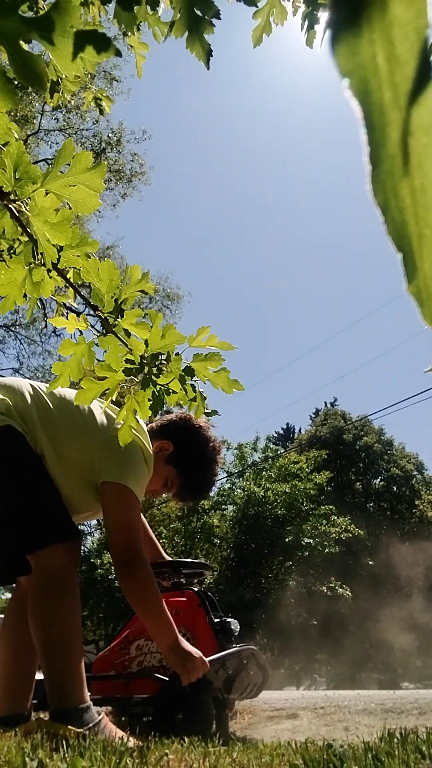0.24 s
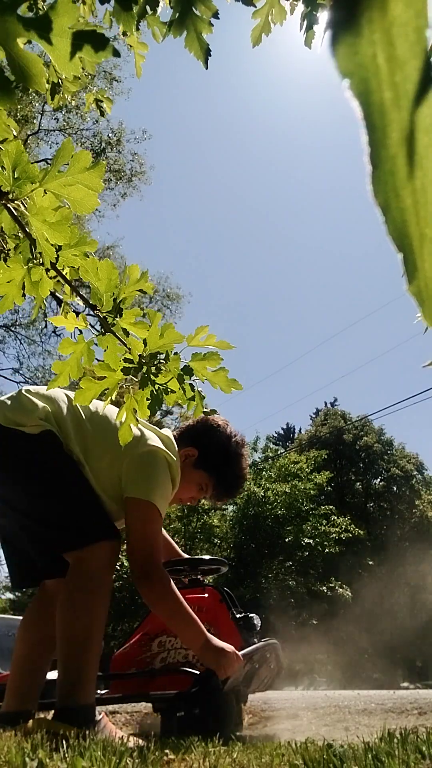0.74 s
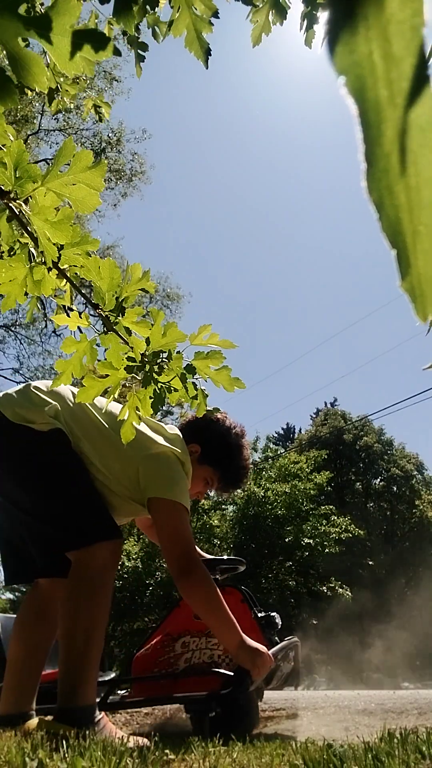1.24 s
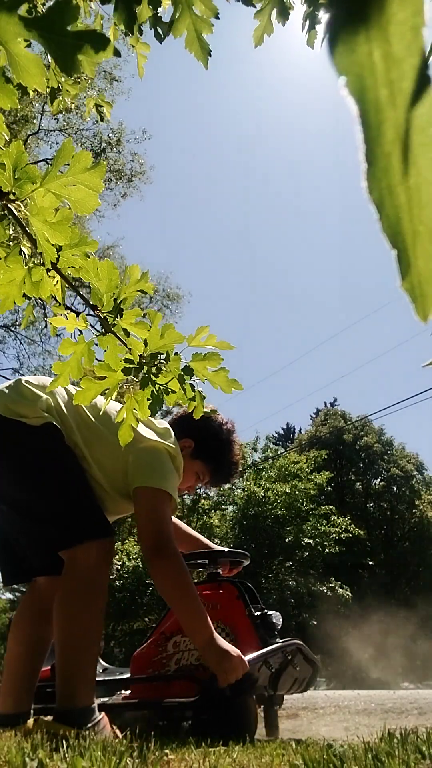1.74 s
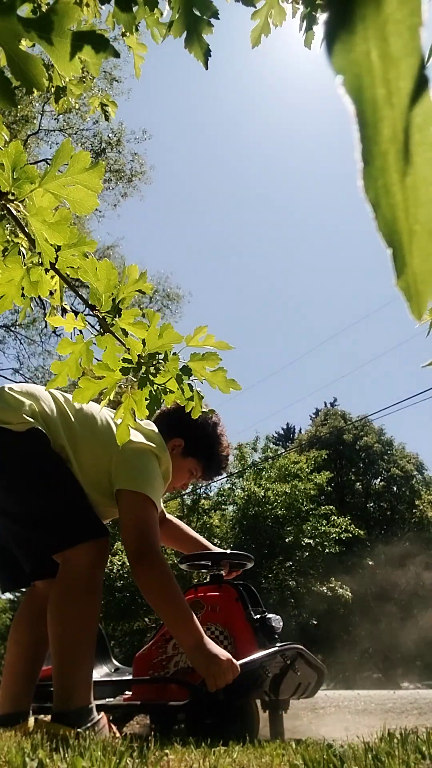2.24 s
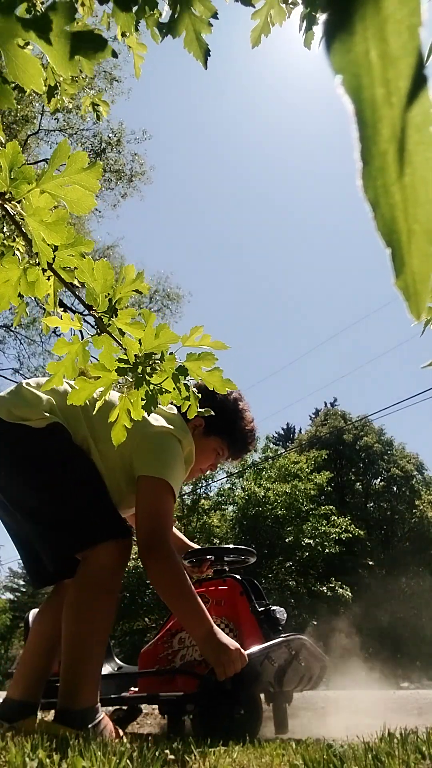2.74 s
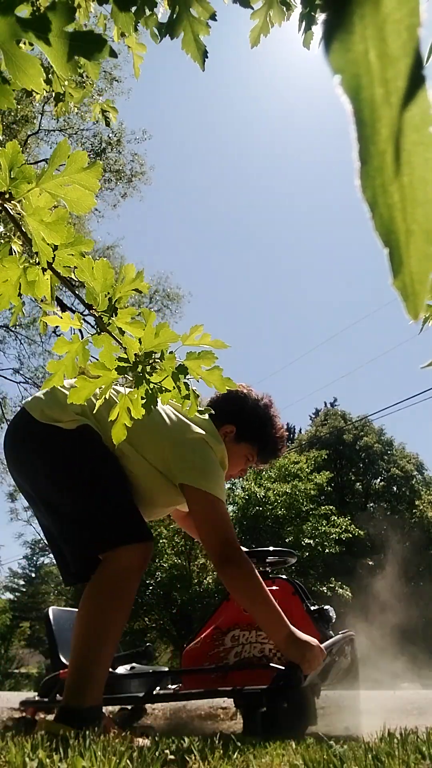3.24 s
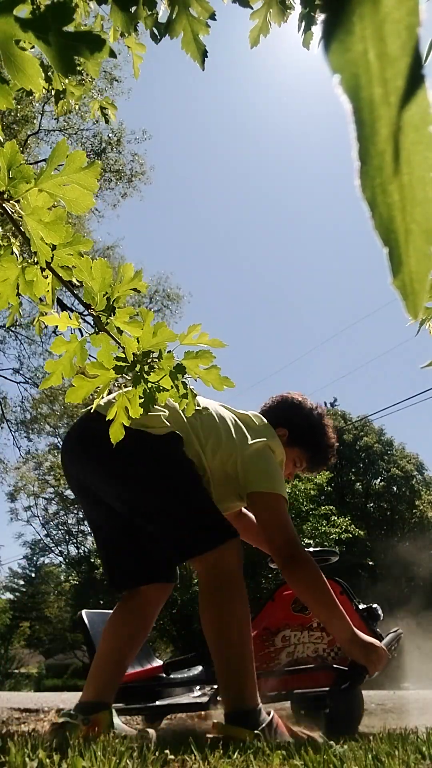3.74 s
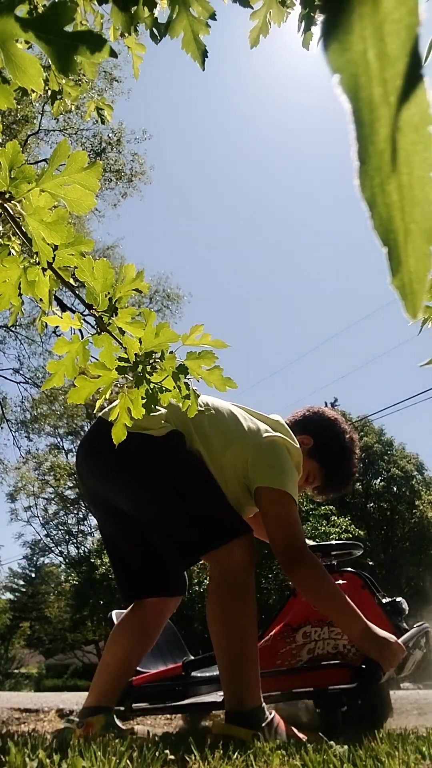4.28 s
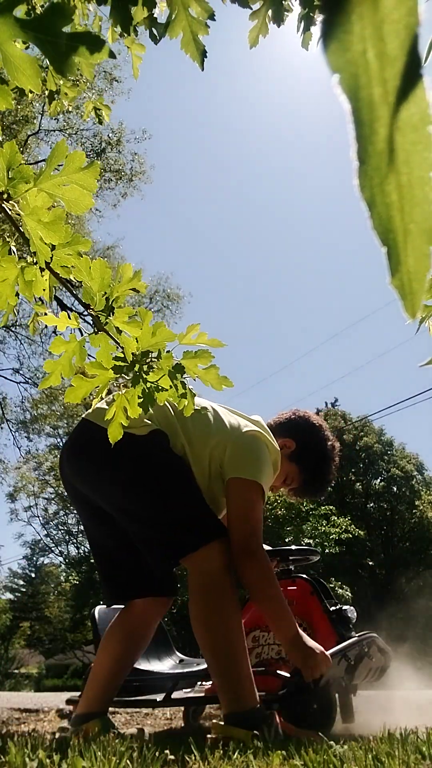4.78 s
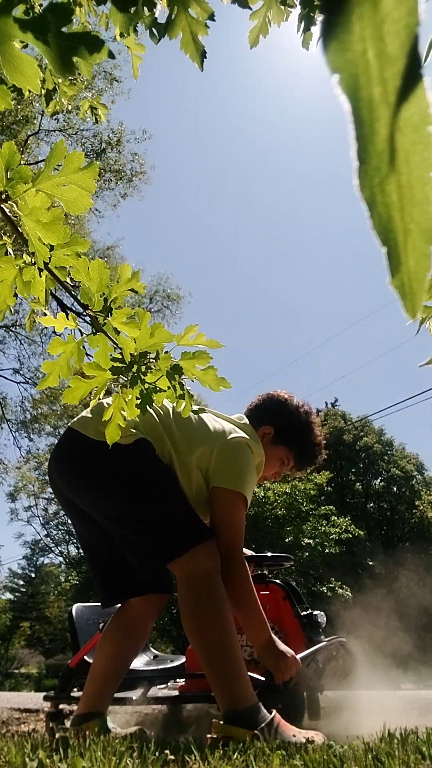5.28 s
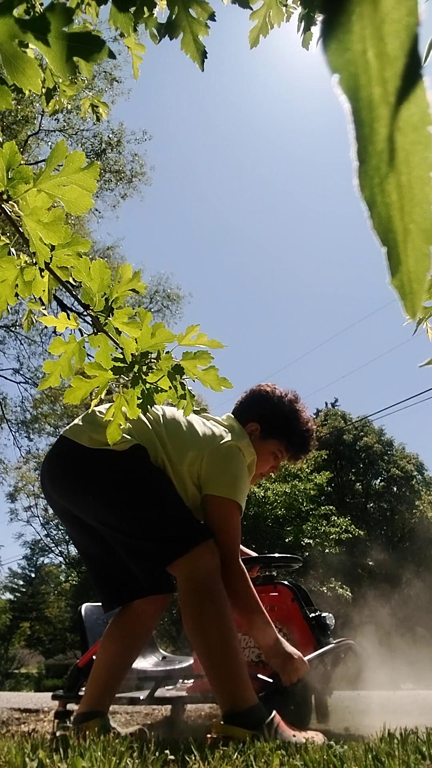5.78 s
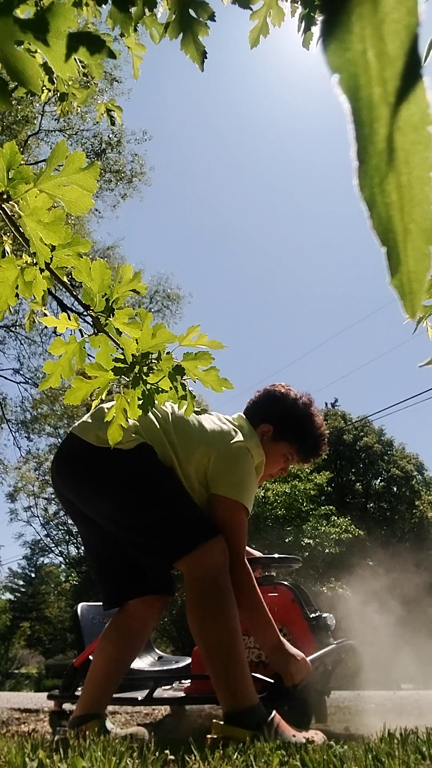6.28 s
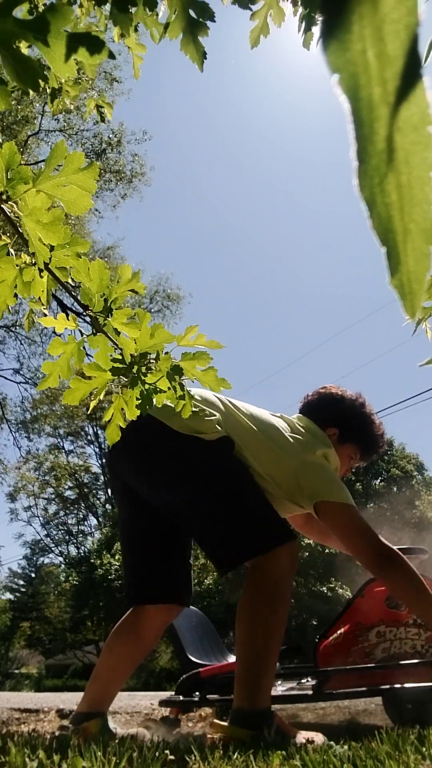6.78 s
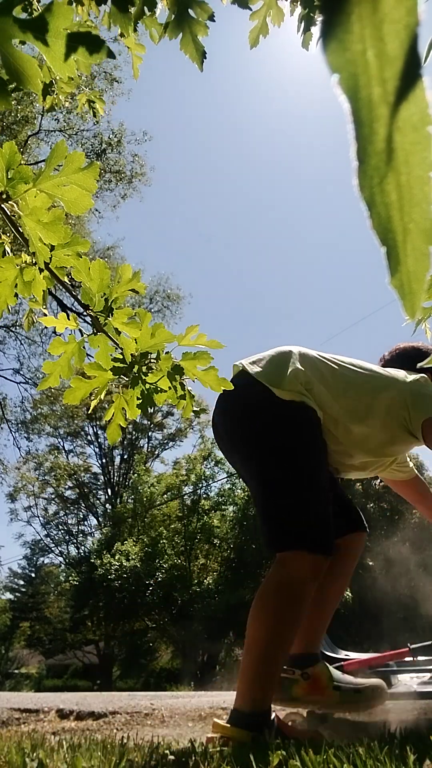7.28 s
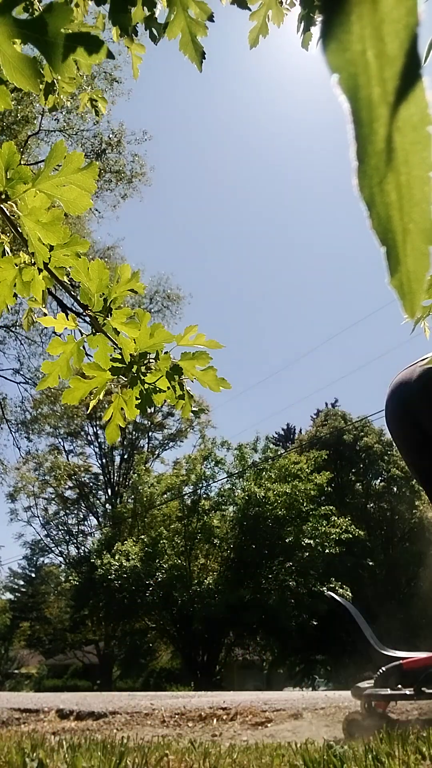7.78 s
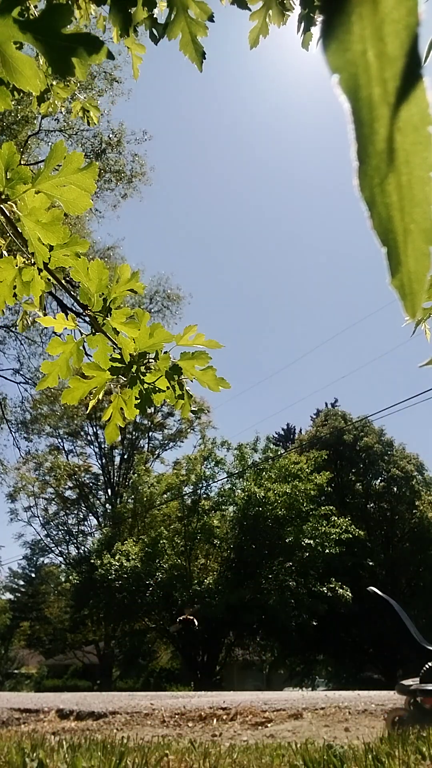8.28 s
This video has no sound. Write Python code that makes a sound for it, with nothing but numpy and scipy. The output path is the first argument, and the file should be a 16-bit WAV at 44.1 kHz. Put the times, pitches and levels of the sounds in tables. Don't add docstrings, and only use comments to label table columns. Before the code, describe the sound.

An electric kart held back at the roadside whines, then its drive wheel hops and drums on gravel, labours, stops and coasts off with ticking casters.

```python
import sys
import numpy as np
from scipy import signal
from scipy.fft import rfft, irfft, next_fast_len
from scipy.io import wavfile
from scipy.ndimage import map_coordinates

SR = 44100
rng = np.random.default_rng(int(sys.argv[2]) if len(sys.argv) > 2 else 0)


def dump(signal):
    limited = np.clip(np.atleast_2d(signal).T, -1, 1)
    pcm = np.round(limited * 32767).astype(np.int16)
    wavfile.write(sys.argv[1], SR, pcm)


def voltage_ratio(level):
    return 10 ** (np.asarray(level, float) / 20)


N = 375725
TOP_HZ = 15870


def unit(x):
    return x / np.sqrt(np.mean(x ** 2) + 1e-20)


def along(points, hz):
    f, v = np.transpose(points)
    return np.interp(np.log(hz + 1), np.log(f + 1), v)


def curves(rows):
    s, *cols = np.transpose(rows)
    return [np.interp(np.arange(N) / SR, s, c) for c in cols]


def wobble(rate):
    return map_coordinates(rng.standard_normal(int(N * rate / SR) + 4), [np.arange(N) * rate / SR])


def filtered(x, response):
    m = next_fast_len(N + SR // 2)
    return irfft(rfft(x, m) * response(np.fft.rfftfreq(m, 1 / SR)), m)[..., :N]


def modes(table):
    def response(f):
        return sum((-1) ** k * voltage_ratio(db) * 1j * f * width / (hz * hz - f * f + 1j * f * width)
                   for k, (hz, width, db) in enumerate(table))
    return response


def colour(spectrum):
    return lambda hz: voltage_ratio(along(spectrum, hz))


def grains(lumpy_db, rate):
    return unit(voltage_ratio(lumpy_db * wobble(rate)) * rng.standard_normal(N))


def bursts(times, envelopes):
    out = np.zeros(N + SR)
    for s, e in zip(times, envelopes * rng.standard_normal(envelopes.shape)):
        out[round(s * SR):][:len(e)] += e
    return out[:N]


# (time [s], peak level [dB], frame note [Hz])
HOPS = [(0.352, -21, 275.9), (0.74, -16, 311), (0.771, -10.5, 249), (0.833, -11.5, 220), (1.023, -12, 215),
        (1.082, -7.5, 232), (1.267, -11, 230), (1.34, -5.5, 238), (1.397, -12, 241), (1.566, -14.5, 219),
        (1.938, -16.5, 204), (1.999, -9.5, 206), (2.169, -4, 225), (2.638, -13.5, 255.7), (3.016, -9, 196),
        (3.081, -12, 217), (3.168, -4.5, 275), (3.24, -15, 228), (3.288, -4.5, 234.4), (3.392, -4, 246),
        (3.602, -9.5, 268), (3.659, -24, 220), (3.739, -7.5, 247), (3.845, -10, 260), (4.063, -10.5, 284),
        (4.108, -15, 280), (4.162, -7, 273), (4.342, -1.5, 238), (4.424, -4, 266), (4.462, -8, 225.8),
        (4.495, -12, 268), (4.71, -15, 279), (4.818, -8, 260.4), (4.915, -14, 255), (4.957, -15, 264),
        (5.036, -3, 242), (5.116, -15, 301), (5.278, -11, 278), (5.354, -24, 271.7), (5.426, -6, 238.6),
        (5.527, -30, 263), (5.574, -6, 262), (5.672, -5, 256.3), (5.705, -11.5, 230), (5.822, -13, 253),
        (5.972, -16, 270), (6.089, -16, 293), (6.484, -9, 219), (6.553, -19, 225), (6.734, -7.5, 232),
        (6.819, -10, 245), (6.857, -6, 285), (6.915, -5.5, 250), (6.982, -16.5, 236), (7.302, -13, 242),
        (7.755, -22, 302), (8.199, -20.5, 245), (8.367, -11.5, 274)]
# (time [s], peak level [dB], frame note [Hz])
MORE_HOPS = [(.005, -16, 244), (.065, -19, 242), (.93, -13, 238), (1.125, -6, 239), (4.325, -7.5, 299.5),
             (4.586, -7.5, 250), (7.034, -13.5, 262), (7.327, -17.5, 246), (7.35, -23.5, 254),
             (7.428, -22, 300), (7.45, -22.5, 257), (7.512, -25, 262), (7.618, -25.5, 245), (7.64, -32, 246),
             (7.839, -26, 270), (7.675, -25, 274), (8.329, -15.5, 256), (8.431, -8.5, 257),
             (8.445, -11.5, 263.5)]


def landings():
    out, t = np.zeros(N + SR), np.arange(SR // 8) / SR
    for s, db, hz in [*HOPS, *MORE_HOPS]:
        ring = voltage_ratio(db + 6.5 - 60 * t / 0.068) * (1 - np.exp(-t / 0.0053))
        out[round(s * SR):][:len(t)] += ring * np.sin(2 * np.pi * hz * t)
    return out[:N]


def damped():
    full_db, lead_s, t60 = -19, .006, .1
    grab, t = np.zeros(N + SR), np.arange(SR // 8) / SR
    for s, db, _ in [*HOPS, *MORE_HOPS]:
        grip = voltage_ratio(db - full_db - 60 * t / t60) * (1 - np.exp(-3 * t / lead_s))
        grab[max(round((s - lead_s) * SR), 0):][:len(t)] += grip
    return 1 / np.sqrt(1 + grab[:N] ** 2)


# (time [s], peak level [dB])
KNOCKS = [(0.052, -24), (0.42, -17), (0.834, -14), (0.88, -19), (1.098, -19), (1.139, -44), (1.187, -13),
          (1.254, -20), (1.393, -26), (1.541, -14), (1.721, -10), (1.805, -19), (1.931, -21), (1.993, -12),
          (2.167, -14.5), (2.641, -12.5), (3.046, -13), (3.284, -10), (3.367, -23), (3.586, -11.5),
          (3.68, -35), (3.708, -22), (3.837, -20), (4.026, -17), (4.212, -22), (4.288, -15), (4.452, -16.5),
          (4.554, -19), (5.034, -14.5), (5.197, -19), (5.266, -16), (5.398, -15), (5.479, -15.5),
          (5.659, -16.5), (5.684, -15), (5.825, -13.5), (5.862, -18.5), (6.047, -20), (6.264, -22),
          (6.544, -22.5), (6.585, -28), (6.608, -5), (6.641, -15), (6.872, -20), (6.91, -14.5),
          (6.981, -22.5), (7.303, -33), (7.753, -31.5), (8.369, -14.5), (8.431, -7.5)]
# (time [s], rattle level [dB], shell jar level [dB])
COAST = [(7.066, -46, -46), (7.0898, -51, -39), (7.1064, -40.5, -31), (7.2002, -41, -36.5),
         (7.248, -45.5, -48), (7.3146, -60, -57), (7.3293, -47, -39), (7.422, -53, -44),
         (7.498, -47.5, -50), (7.5066, -40, -57), (7.5478, -54, -57), (7.5906, -53, -52), (7.66, -52, -54),
         (7.736, -63, -63), (7.7485, -49.5, -46.5), (7.8316, -56, -44.5), (7.9015, -64, -48.5),
         (8.1495, -53, -47)]
COAST_JAR_DB = 7
# (frequency [Hz], width [Hz], level [dB])
FRAME = [(202.7, 69, -2.5), (245, 56.9, 1.5), (316.7, 46.8, -2.5), (420, 118, -7.5), (496, 173, -13)]
# (frequency [Hz], width [Hz], level [dB])
SHELL = [(644, 79, 3.5), (821, 47, 4.5), (875, 90, 1), (1153, 217, -4), (1385, 97, -7.5), (1794, 416, -8),
         (1968, 180, -11)]


def jars():
    knock_db, crack_db, crack_t60, frame_db = -4, 8, .008, 1
    t = np.arange(SR // 8) / SR
    events = [(s, db + knock_db) for s, db in KNOCKS] + [(s, db + COAST_JAR_DB) for s, _, db in COAST]
    s, db = np.transpose(events)[..., None]
    blows = bursts(s[:, 0], voltage_ratio(db + 6.5 - 60 * t / 0.098) * (1 - np.exp(-t / 0.00099)))
    cracks = np.zeros(N)
    cracks[np.round(s[:, 0] * SR).astype(int)] = voltage_ratio(db[:, 0] + crack_db + 19.0)
    cracks += bursts(s[:, 0], voltage_ratio(db + crack_db + 1.5 - 60 * t / crack_t60))
    shell = filtered(blows + cracks, modes(SHELL))
    body = filtered(cracks, modes([(746, 760, -10.5)]))
    return shell + body + voltage_ratio(frame_db) * filtered(blows, modes(FRAME[2:]))


def caster_thuds():
    t = np.arange(SR // 8) / SR
    s, _, db = np.transpose(COAST)[..., None]
    fall = voltage_ratio(db + COAST_JAR_DB + 36.0 - 60 * t / 0.072)
    return filtered(bursts(s[:, 0], fall * (1 - np.exp(-t / 0.0017))), modes(FRAME[3:]))


def lifts():
    lift_s, lift_db = .015, -10
    t = np.arange(N) / SR
    s = np.array([s for s, _ in KNOCKS] + [np.inf])
    to_next = s[np.searchsorted(s, t)] - t
    return voltage_ratio(lift_db * np.clip(2 - 2 * to_next / lift_s, 0, 1))


# (time [s], drumming level [dB], hold [s])
BITES = [(0, -19.5, 0.0079), (0.722, -18, 0.12), (0.824, -12, 0.086), (1.081, -13, 0.36),
         (1.564, -8.5, 0.05), (1.683, -15.5, 0.066), (1.971, -7.5, 0.066), (2.16, -10, 0.0089),
         (2.623, -25.5, 0.17), (3.005, -8, 0.07), (3.288, -12.5, 0.018), (3.381, -15, 0.019),
         (3.592, -13, 0.15), (4.111, -23, 0.067), (4.312, -9.5, 0.014), (4.433, -18.5, 0.13),
         (5.019, -19, 0.026), (5.376, -16, 0.06), (5.574, -17, 0.13), (6.55, -10, 0.13),
         (6.747, -21, 0.041), (6.859, -11, 0.073), (7.302, -37, 0.029), (8.355, -16, 0.13)]


def bites():
    attack_s, release_db_per_s = 0.0091, 176
    out, t = np.zeros(N), np.arange(N) / SR
    for s, db, hold in BITES:
        fall = voltage_ratio(db - release_db_per_s * np.clip(t - s - hold, 0, None))
        out += fall * np.clip((t - s) / attack_s + 1, 0, 1)
    return out


def tread_drum():
    ring = modes(FRAME)
    return unit(filtered(grains(lumpy_db=1.0, rate=32), lambda f: ring(f) * f ** 2 / (f ** 2 + 15.0 ** 2)))


# (frequency [Hz], level [dB per Hz])
SCRUB = [(100, -2), (300, 26.5), (500, 13.5), (800, -25), (1600, 7.5), (2300, -4), (3000, -81)]


def gravel_scrub():
    gravel = grains(lumpy_db=1.0, rate=70)
    direct = unit(filtered(gravel, colour(SCRUB)))
    return unit(direct + voltage_ratio(-1.5) * unit(filtered(gravel, modes(SHELL))))


# (frequency [Hz], level [dB per Hz])
GRIT = [(2400, 3), (3530, -1), (3680, 6), (4600, 3), (6400, 1.5), (7200, -1), (8500, -10), (11000, -1.5),
        (13500, 2), (15800, -4.5)]
# (frequency [Hz], width [Hz], level [dB])
CHAIN = [(3688, 38, 9), (4090, 23, 4.5), (6050, 130, 5), (6490, 60, 4.5)]


def chain_grit():
    grit = filtered(grains(lumpy_db=0.5, rate=32), colour(GRIT))
    return unit(grit + voltage_ratio(-0.5) * filtered(rng.standard_normal(N), modes(CHAIN)))


# (frequency [Hz], width [Hz], level [dB])
CASE = (1400, 20, 0)


def motor_case():
    return unit(filtered(rng.standard_normal(N), modes([CASE])))


# (time [s], grip level [dB], spin level [dB], loose gravel level [dB])
WHEEL = [(0, -26.5, -41, -0.5), (.45, -25, -45, 0), (.8, -22, -43.5, -1), (1.5, -19, -44, -1),
         (1.9, -21, -39, -1), (2.3, -25, -39.5, -1), (2.96, -24.5, -39, -1.5), (3.3, -15.5, -43.5, -1),
         (4.7, -18, -45.5, -2), (5.5, -16, -46, -2.5), (5.95, -21, -44, 1), (6.5, -18.5, -45, 0),
         (6.83, -19.5, -45.5, -2), (7.0, -22.5, -65, 1), (7.2, -21.5, -74, -6), (8.04, -41.5, -78, -6),
         (8.28, -30.5, -62, -1), (8.52, -23.5, -56, -2)]


def wheel():
    grip_db, spin_db, gravel_db = curves(WHEEL)
    drum_db = 20 * np.log10(voltage_ratio(grip_db) + bites())
    scrub_db = -2.5 + gravel_db + 0.5 * drum_db + 0.42 * spin_db
    grit_db = spin_db - 0.082 * (drum_db - grip_db)
    jolt = wobble(14)
    drum = voltage_ratio(drum_db - 8.5 + 0.79 * jolt) * damped() * tread_drum()
    case = voltage_ratio(spin_db - 8 + 1.6 * wobble(5.0)) * motor_case()
    scrub = voltage_ratio(scrub_db + 1.2 * jolt) * lifts() * gravel_scrub()
    grit = voltage_ratio(grit_db + 1.4 * jolt) * chain_grit()
    return drum + case + scrub + grit


# (time [s], frequency [Hz], level [dB])
TOOTH = [
    [(0.85, 218, -17), (0.888, 220.2, -35), (0.914, 242, -21.5), (0.952, 236.4, -11), (0.978, 220, -39),
     (1.03, 233, -21)],
    [(1.03, 272, -22), (1.084, 241.5, -18.5), (1.204, 309, -22), (1.266, 235.9, -18), (1.398, 232.7, -14.5),
     (1.53, 293, -34)],
    [(1.53, 233, -42), (1.566, 227.3, -20), (1.704, 240.3, -21), (1.716, 273.6, -27), (1.994, 220, -30),
     (2.2, 235.5, -24)],
    [(2.62, 245, -38), (2.678, 295.3, -20), (2.706, 247, -22.5), (2.882, 259.5, -33), (2.912, 327, -47),
     (2.95, 290, -44)],
    [(3.0, 204.5, -44), (3.022, 201.5, -16), (3.162, 261, -22.5), (3.418, 243.4, -22),
     (3.434, 223.5, -18.5), (3.55, 244, -29)],
    [(3.55, 240.6, -22.5), (3.728, 222.8, -17), (3.844, 236.5, -20), (3.88, 292, -22.5),
     (4.044, 294.7, -27.5), (4.1, 261, -31)],
    [(4.1, 272.4, -35), (4.164, 255.3, -20.5), (4.262, 264, -17.5), (4.338, 245.3, -22), (4.346, 255, -6.5),
     (4.4, 235, -42)],
    [(4.4, 227, -35), (4.428, 251, -13), (4.556, 234.1, -19), (4.572, 246.8, -22), (4.876, 267, -30.5),
     (4.9, 241, -20)],
    [(4.9, 271.7, -29.5), (5.066, 245.7, -20), (5.094, 294.3, -27), (5.294, 278.7, -24.5),
     (5.478, 234.2, -18), (5.55, 255, -27)],
    [(5.55, 233.7, -35), (5.618, 271.4, -23), (5.708, 248.3, -19), (6.012, 281, -35.5), (6.048, 324, -35),
     (6.08, 326, -24)],
]
# (time [s], frequency [Hz], level [dB])
SURGE = [
    [(6.5, 245, -23.5), (6.568, 245.5, -19), (6.594, 314.9, -16.5), (6.632, 258.5, -19.5),
     (6.732, 267, -23), (6.784, 238, -16.5), (6.85, 267, -27)],
    [(6.85, 276, -40), (6.86, 272.3, -17), (6.94, 264.2, -16.5), (6.962, 281.5, -22.5),
     (7.002, 244.6, -28.5), (7.194, 281, -32), (7.25, 239, -31.5)],
    [(8.3, 264, -53), (8.322, 250.4, -31), (8.368, 267.6, -19.5), (8.402, 247.3, -27.5),
     (8.432, 261.5, -12), (8.49, 228, -29), (8.52, 230, -23)],
]


def laboured():
    out, waver, tear_db = np.zeros(N), 1 + .012 * wobble(35), 2.0 * wobble(40)
    for rows in [*TOOTH, *SURGE]:
        s, hz, db = np.transpose(rows)
        n = np.arange(round(s[0] * SR), min(round(s[-1] * SR), N))
        turn = 2 * np.pi * np.cumsum(np.interp(n / SR, s, hz) * waver[n]) / SR
        fade = np.clip(np.minimum(n - n[0], n[-1] - n) / (.004 * SR), 0, 1)
        tone = np.sin(turn) + voltage_ratio(-17.0) * np.sin(2 * turn) + voltage_ratio(-21.5) * np.sin(3 * turn)
        out[n] += fade * voltage_ratio(np.interp(n / SR, s, db) + tear_db[n]) * tone
    return out


# (time [s], tooth rate [Hz], note level [dB], octave level [dB], upper multiples level [dB])
WHINE = [
    [(0, 382, -39, -35, -54), (.18, 353.4, -58, -45.5, -58), (.23, 336.7, -31, -44.5, -54),
     (.37, 280.2, -19.5, -38.5, -37), (.465, 287.2, -21, -44, -39), (.49, 300, -35, -51, -50),
     (.515, 304.4, -24.5, -50, -45), (.655, 276.6, -21.5, -45, -48), (.69, 305, -25, -44, -49),
     (.85, 329, -31, -52, -55)],
    [(1.65, 446, -51, -42, -37), (1.85, 464, -54, -50, -32), (2.1, 472, -49, -56, -42),
     (2.21, 455.4, -31, -48, -32), (2.34, 490, -33, -43, -33), (2.5, 480.4, -31.5, -41, -30),
     (2.64, 461, -33, -36, -33), (2.8, 428.5, -32, -44, -33), (3, 411.6, -31.5, -38, -26.5)],
    [(6.08, 320, -31.5, -46, -33), (6.15, 335.4, -30.5, -52, -41), (6.22, 305.4, -27, -66, -43),
     (6.31, 306.1, -26.5, -48, -43), (6.36, 268, -21, -61, -48), (6.41, 270.3, -18, -50, -44),
     (6.5, 218, -30, -51, -58)],
]
# (multiple of tooth rate, level [dB], shell note [Hz], width [Hz], raggedness [rad])
OVERTONES = [(3, 4, 855, 110, .5), (2.5, -9, 1190, 200, .8), (3, -16, 1420, 160, .9),
             (3.5, -6, 1420, 110, .7), (4, -7, 1920, 170, 1.0)]


def whine():
    lead_s, fade_s = .043, .014
    out, t = np.zeros(N), np.arange(N) / SR
    unsteady = [(2 * wobble(22), wobble(160)) for _ in OVERTONES]
    waver = 1 + .0077 * wobble(40)
    octave_db, octave_rad = 3 + 3 * wobble(30), .5 * wobble(160)
    note_db, note_rad = 2 + 3.2 * wobble(30), .35 * wobble(70)
    for rows in WHINE:
        start, end = rows[0][0], rows[-1][0]
        n = slice(max(round((start - lead_s) * SR), 0), round(end * SR))
        hz, note, octave, over_db = (c[n] for c in curves(rows))
        turn = 2 * np.pi * np.cumsum(hz * waver[n]) / SR
        fade = np.clip(np.minimum(t[n] - start + lead_s, end - t[n]) / fade_s, 0, 1)
        tone = voltage_ratio(note + note_db[n]) * np.sin(turn + note_rad[n])
        tone += voltage_ratio(octave + octave_db[n]) * np.sin(2 * turn + octave_rad[n])
        for (k, db, sings_hz, width, ragged), (swell_db, tear) in zip(OVERTONES, unsteady):
            boost = abs(modes([(sings_hz, width, 0)])(k * hz))
            tone += voltage_ratio(over_db + db + swell_db[n]) * boost * np.sin(k * turn + ragged * tear[n])
        out[n] += fade * tone
    return out


# (time [s], frequency [Hz], level [dB])
SPROCKET = [(0, 4100, -57), (.6, 4090, -55), (.9, 4006, -48.5), (1.3, 4020, -76), (1.5, 4008, -90)]


def sprocket_squeal():
    hz, db = curves(SPROCKET)
    turn = 2 * np.pi * np.cumsum(hz) / SR
    return voltage_ratio(db + 2.6 * wobble(25.9)) * np.sin(turn + 0.43 * wobble(74))


# (time [s], peak level [dB], bright top level [dB])
RATTLES = [(0.7148, -41, 0), (0.839, -33, -2), (0.9077, -30.5, -12), (1.196, -28, -13), (1.35, -34, -8),
           (2.6144, -33.5, 2), (3.152, -30, -18), (3.291, -31, -5), (3.671, -33, -6), (4.3248, -30, -15),
           (4.538, -34.5, -9), (5.001, -36, -13), (5.664, -38, -10), (6.506, -35, -4), (6.6147, -24.5, -14),
           (6.663, -29, -18.5), (6.911, -33.5, -7), (6.9412, -32.5, -17), (6.976, -36, -16),
           (8.203, -39, -11), (8.265, -46, 1), (8.285, -42, -9), (8.344, -40, -5), (8.37, -36.5, -4),
           (8.4246, -30, -9)]


def rattles():
    length, coast_top_db = 0.011, -17
    t = np.arange(SR // 8) / SR
    s, db, top_db = np.transpose([*RATTLES] + [(s, db, coast_top_db) for s, db, _ in COAST])[..., None]
    rise = np.where(np.arange(len(s)) < len(RATTLES), .5, .08)[:, None]
    swell = (t / length) ** rise * np.exp(-t / length)
    middle = bursts(s[:, 0], voltage_ratio(db + 3.5) * swell)
    top = bursts(s[:, 0], voltage_ratio(db + top_db + 8.0) * swell)
    scrape = colour([(700, 7), (1500, 7), (2500, 6.5), (3400, -8.0), (5000, 0.0), (6600, -1.5), (8000, -12)])
    return filtered(middle, scrape) + filtered(top, lambda hz: voltage_ratio(along(GRIT, hz)) * (hz > 8800))


# (time [s], peak level [dB], note [Hz], t60 [s])
STONES = [
    (0.286, -19, 2970, 0.003),
    (0.431, -21, 2650, 0.0032),
    (1.097, -22, 2160, .008),
    (3.155, -29, 5780, 0.031),
    (4.922, -25.5, 2800, 0.0067),
]


def stones():
    out, t = np.zeros(N), np.arange(SR // 10) / SR
    for s, db, hz, t60 in STONES:
        out[round(s * SR):][:len(t)] += voltage_ratio(db - 60 * t / t60) * np.sin(2 * np.pi * hz * t)
    return out


# (time [s], peak level [dB], t60 [s])
SNAP = (2.4265, -14, 0.017)


def snap():
    (s, db, t60), t = SNAP, np.arange(SR // 10) / SR
    fall = voltage_ratio(db - 60 * t / t60) + voltage_ratio(db - 15 - 60 * t / 0.11)
    a, b = (bursts([s], fall[None]) for _ in range(2))
    pair = np.array([1.8 * a + .5 * b, .5 * a - 0.1 * b])
    return filtered(pair, colour([(600, -30), (1500, -11), (3000, -18.0), (6500, 2.5), (8500, -9.0),
                                  (12500, 3), (16600, -3.0), (17000, -60)]))


# (start [s], end [s], fade [s], level [dB], frequency [Hz], width [Hz])
ROLL = (7, 8, 0.2, -48, 560, 300)


def roll():
    (start, end, fade, db, hz, width), t = ROLL, np.arange(N) / SR
    ring = modes([(hz, width, 0)])
    rumble = unit(filtered(grains(lumpy_db=3.0, rate=30), lambda f: ring(f) / (1 + (f / 760) ** 12)))
    return voltage_ratio(db) * np.clip(np.minimum(t - start, end - t) / fade, 0, 1) * rumble


# (time [s], level [dB], length [s])
PUFF = (8.0, -33, 0.036)


def scuff():
    (s, db, length), t = PUFF, np.arange(SR // 8) / SR
    dust = bursts([s], (voltage_ratio(db) * np.sqrt(t / length) * np.exp(-t / length))[None])
    grit = filtered(dust, lambda hz: voltage_ratio(along(GRIT, hz)) * (hz < TOP_HZ))
    return filtered(dust, modes([(1920, 550, 0.5)])) + voltage_ratio(-34.0) * grit


# (time [s], firing rate [Hz], level [dB])
DRONE = [(0.0, 80, -42), (0.09, 77.3, -43), (0.28, 78.3, -46.5), (0.66, 80.5, -38), (1.83, 75.85, -41.5),
         (3.7, 80.06, -36.5), (4.41, 78.4, -37), (4.48, 80.4, -41.5), (6.69, 79.1, -39.5),
         (7.17, 77.66, -34), (8.52, 78.1, -35.5)]
# (multiple of firing rate, level [dB])
DRONE_ORDERS = [(1, -2), (2, -13.5), (3, -13.5), (4, -43), (5, -38)]


def drone():
    hz, db = curves(DRONE)
    turn = 2 * np.pi * np.cumsum(hz * (1 + 0.0033 * wobble(6.6))) / SR
    return sum(voltage_ratio(db + 5.5 + level + 0.19 * k ** .5 * wobble(3.9)) * np.sin(k * turn + k * k)
               for k, level in DRONE_ORDERS)


# (frequency [Hz], level [dB per Hz])
AIR = [(20, -44), (46, -12), (82, 2), (126, 4.5), (240, -21.5), (650, -15), (900, -43), (1800, -43),
       (3440, -44.5), (15500, -83)]


def air():
    a, b = rng.standard_normal((2, N))
    pair = np.array([a + 0.13 * b, a - 0.13 * b])
    floor = unit(filtered(pair, lambda hz: (hz < TOP_HZ) * voltage_ratio(along(AIR, hz))))
    return voltage_ratio(-42.5 + wobble(2.2)) * floor


# (frequency [Hz], left minus right level [dB])
PORTS = [(60, -6), (110, -4.5), (200, -2), (380, -2.5), (700, -5.5), (1290, -3.5), (2380, 3.5), (4400, 8.5),
         (8120, 8), (15000, 7)]
# (frequency [Hz], share of power [0-1])
SCATTER = [(700, .005), (1400, .05), (2600, .25), (3300, .25), (4500, .65), (15000, .8)]
# (frequency [Hz], phase [rad])
SHADOW = [(700, 0), (1030, -.32), (1700, -.68), (2400, -.72), (3100, -.3), (4300, 0), (6500, .5)]


def ports(x):
    z = signal.stft(x, SR, nperseg=256, noverlap=192)[2]
    turns = np.exp(2j * np.pi * rng.random((2, *z.shape)))
    scattered = 2 * signal.istft(z * turns, SR, nperseg=256, noverlap=192)[1][:, :N]
    share = lambda hz: along(SCATTER, hz)
    both = filtered(x, lambda hz: np.sqrt(1 - share(hz)))
    both = both + filtered(scattered, lambda hz: np.sqrt(share(hz)) * (hz > 500))
    t = np.arange(SR // 20) / SR
    tail = rng.standard_normal(len(t)) * voltage_ratio(-60 * t / 0.088)
    echo = signal.fftconvolve(both, tail[None] / np.linalg.norm(tail), axes=1)[:, :N]
    both = both + voltage_ratio(-10) * filtered(echo, lambda hz: hz ** 2 / (hz ** 2 + 2500. ** 2))
    side, lag_s = np.array([[1], [-1]]), 8 / SR

    def port(hz):
        band = (hz < TOP_HZ) * hz ** 2 / (hz ** 2 + 31.0 ** 2)
        delay = np.exp(-1j * side * (np.pi * hz * lag_s + along(SHADOW, hz) / 2))
        return band * voltage_ratio(side * along(PORTS, hz) / 2) * delay
    return filtered(both, port)


def scene():
    kart = wheel() + damped() * laboured() + whine() + sprocket_squeal()
    kart += landings() + jars() + caster_thuds() + rattles() + roll()
    return ports(kart + stones() + scuff() + drone()) + snap() + air()


def band_limit(x):
    return signal.sosfilt(signal.butter(12, 17010, fs=SR, output="sos"), x)


def record(dry):
    soft = dry / (1 + np.abs(dry / 1.1) ** 4) ** (1 / 4)
    return band_limit(soft)


dry = scene()
out = record(dry)
dump(out)
```